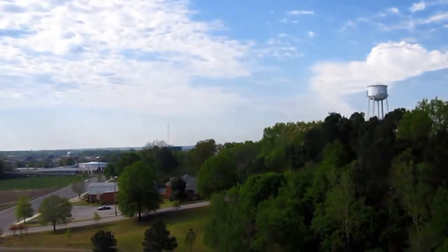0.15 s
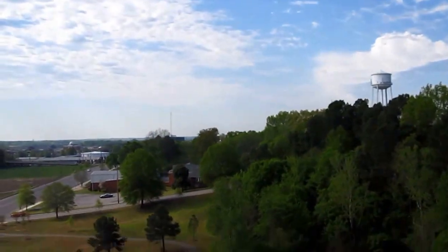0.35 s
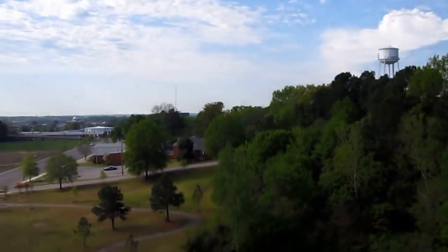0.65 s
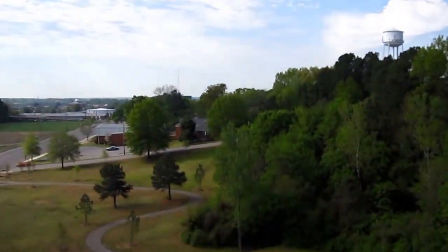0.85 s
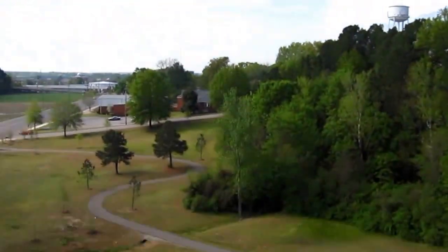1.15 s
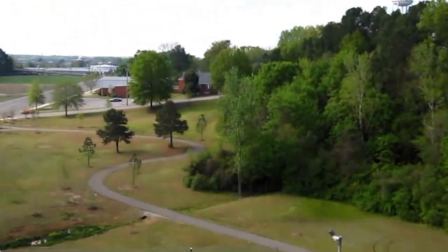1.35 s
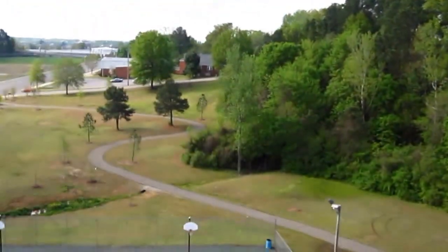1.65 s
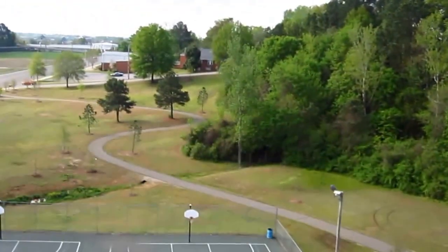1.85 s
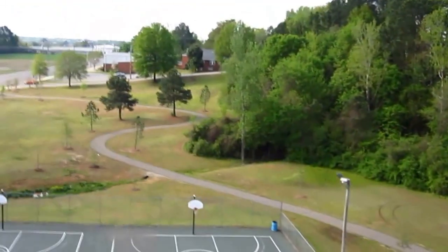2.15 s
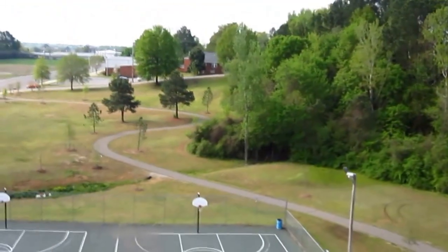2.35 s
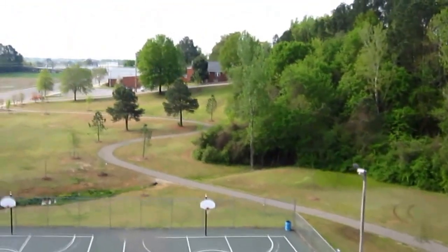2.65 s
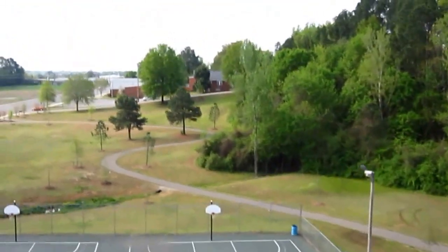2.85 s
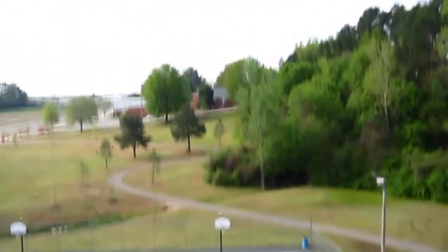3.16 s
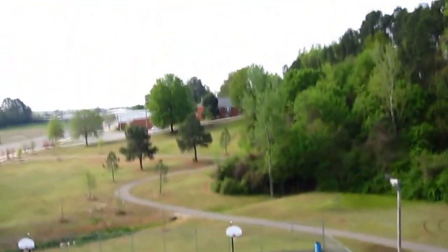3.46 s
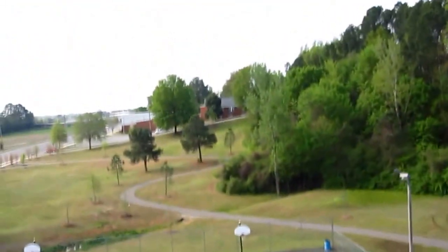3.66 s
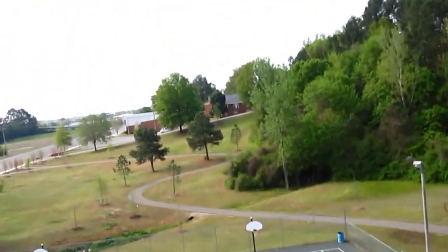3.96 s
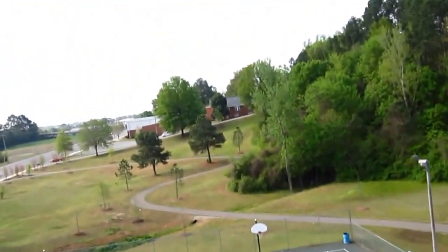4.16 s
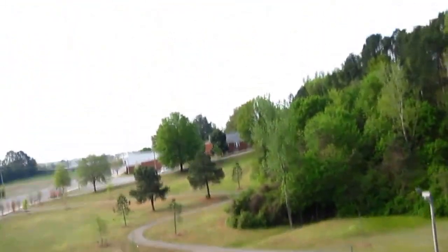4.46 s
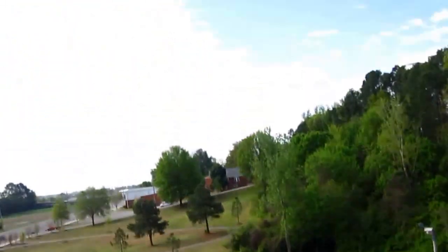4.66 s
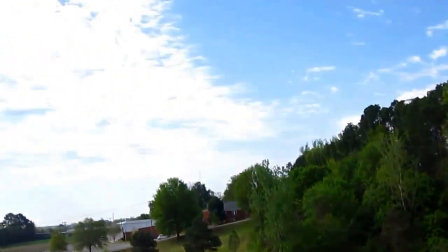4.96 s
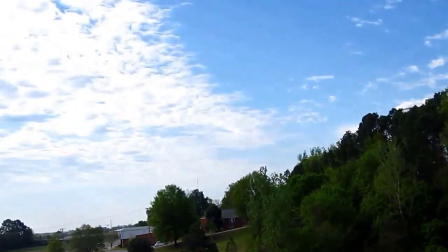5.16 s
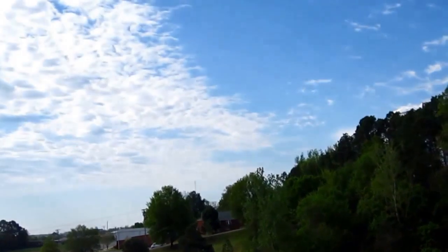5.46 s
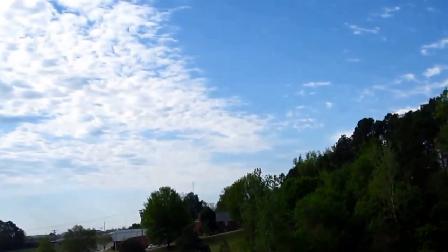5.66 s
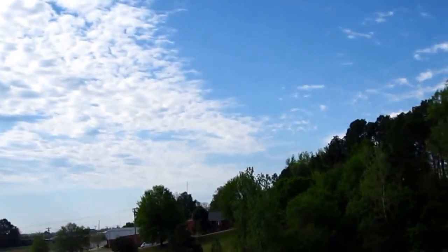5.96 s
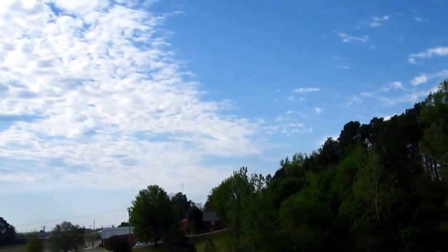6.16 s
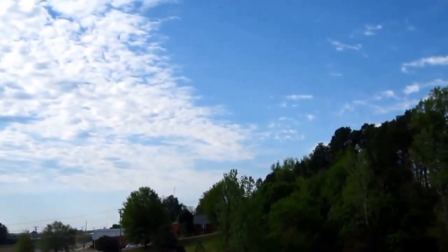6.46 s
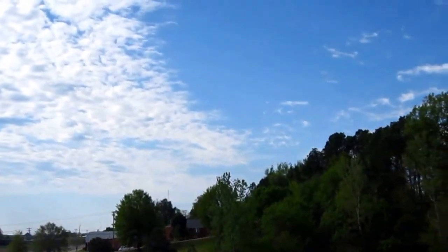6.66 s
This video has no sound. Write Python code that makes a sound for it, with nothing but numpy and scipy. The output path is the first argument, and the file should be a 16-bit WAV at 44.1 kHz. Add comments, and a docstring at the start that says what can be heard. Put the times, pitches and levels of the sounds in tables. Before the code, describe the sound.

A small electric model helicopter whines steadily up close, its pitch rising a little over rushing rotor wind.

```python
"""The gear whine of a small electric helicopter in flight, close up, from one camera microphone on board.
A 13-tooth pinion meshes with the 150-tooth main gear and the sound comes straight through the frame,
along with the speed controller chopping the current. The pitches follow one motor shaft; only the chop
rate stays put. Behind the whine the two-blade rotor slaps and, with the tail rotor, blows turbulent air
over the microphone."""
import sys
import numpy as np
from scipy import signal
from scipy.io import wavfile
from scipy.ndimage import uniform_filter1d

SR = 44100
rng = np.random.default_rng(int(sys.argv[2]) if len(sys.argv) > 2 else 0)


def materialize(psi):
    """Save the field psi as 16-bit PCM at rate SR to the path in sys.argv[1].

    A 1-D psi becomes a single channel; in a 2-D psi each row is a channel.
    """
    bounded = np.clip(np.atleast_2d(psi).T, -1, 1)
    quanta = np.round(bounded * 32767).astype(np.int16)
    wavfile.write(sys.argv[1], SR, quanta)


N = 300321
TIME = np.arange(N) / SR
PINION, MAIN_GEAR = 13, 150  # teeth
LAY_RATIO, TAIL_RATIO = 25 / 32, .3673  # lay shaft and tail rotor turns per motor turn
BLADE_RATIO = 2 * PINION / MAIN_GEAR  # blade passes per motor turn


def gain_of(db):
    """Decibels to a factor."""
    return 10 ** (np.asarray(db) / 20)


def unit_rms(x):
    """Scales to rms 1."""
    return x / np.sqrt(np.mean(x ** 2) + 1e-20)


def curves(table):
    """Each column after t/s as a curve, one value a sample."""
    times, *values = np.transpose(table)
    return [np.interp(TIME, times, v) for v in values]


def wander(lo_hz, hi_hz):
    """Slow random motion between two rates, rms 1."""
    band = signal.butter(2, [lo_hz, hi_hz], "band", fs=SR / 50, output="sos")
    coarse = signal.sosfiltfilt(band, rng.standard_normal(N // 50 + 802))[400:-400]
    return np.interp(np.arange(N) / 50, np.arange(len(coarse)), unit_rms(coarse))


def tone(cycles, db, waver, start=None):
    """A sine of given rms level whose strength wavers a little; start in cycles, else random."""
    start = rng.random() if start is None else start
    strength = np.sqrt(2) * gain_of(db) * (1 + waver * wander(1.46, 55))
    return strength * np.cos(2 * np.pi * (cycles + start))


def turbulence(spectrum, patchy_db, gusty_db, band_hz):
    """Noise with drifting patches and gusts common to all pitches, rms 1 inside band_hz."""
    steps, hz = N // 128 + 5, np.fft.rfftfreq(512, 1 / SR)
    real, imag, patches = rng.standard_normal((3, steps, 257)).transpose(0, 2, 1)
    patches = unit_rms(uniform_filter1d(uniform_filter1d(patches, size=6, axis=0), size=14, axis=1))
    gusts = unit_rms(uniform_filter1d(rng.standard_normal(steps), size=5))
    f, db = np.transpose(spectrum)
    colour_db = np.interp(np.log(hz + 1), np.log(f), db, left=-60, right=-60)
    bins = (real + 1j * imag) * gain_of(colour_db[:, None] + patchy_db * patches + gusty_db * gusts)
    in_band = (hz > band_hz[0]) & (hz < band_hz[1])
    share = np.sum(abs(bins[in_band]) ** 2) / np.sum(abs(bins) ** 2)
    return unit_rms(signal.istft(bins, nperseg=512, noverlap=384)[1][:N]) / np.sqrt(share)


# Motor shaft speed: t/s, f/Hz
SHAFT_SPEED = [(0.0, 367.79), (0.56, 368.18), (1.16, 366.18), (1.3, 366.54), (1.39, 366.68), (1.49, 369.28),
               (1.72, 383.6), (2.18, 404.77), (2.28, 407.74), (2.51, 418.22), (2.97, 431.58),
               (3.11, 438.36), (3.25, 442.73), (3.34, 443.95), (3.53, 441.63), (3.76, 442.92),
               (4.23, 431.84), (4.78, 435.45), (5.15, 433.7), (5.48, 427.72), (5.94, 422.88), (6.8, 417.05)]
# Swing of the shaft angle: t/s, rms angle/deg
SHAFT_HUNTING = [(0, .62), (1.3, .8), (1.5, 2.4), (2, .85), (2.6, .8), (3, 2.6), (3.5, .54), (4, 1.2),
                 (4.25, 2.8), (4.4, 5), (4.6, 2.6), (4.9, 1.8), (5.27, 3.3), (5.6, 1.2), (6.81, .5)]

def shaft_turns():
    """Motor angle in turns; the shaft hunts to and fro when the load is unsteady."""
    hunting = curves(SHAFT_HUNTING)[0] / 360 * wander(6, 35)
    return np.cumsum(curves(SHAFT_SPEED)[0]) / SR + hunting


def shaft_speed(turns):
    """Smoothed shaft speed in Hz."""
    return uniform_filter1d(np.gradient(turns), size=4000, mode="nearest") * SR


def faint_level(slow_db, fast_db, speed):
    """A faint tone's dB: slow_db up to a shaft speed of 370 Hz, sliding to fast_db by 415 Hz."""
    return slow_db + np.clip((speed - 370) / 45, 0, 1) * (fast_db - slow_db)


# Peaks and notches of the path through the frame to the microphone, low and high range: f/Hz, gain/dB
FRAME_PATH_LOW = [(280, -3), (300, 0), (318, 13), (331, -1), (338, -6), (346, 5), (366, 4.5), (390, -9),
                  (435, 0), (590, 0), (635, 5), (670, -2), (695, 3), (735, -3), (775, 8), (830, -4),
                  (975, 4), (1035, -6), (1590, -7), (1750, -4), (1820, 11), (1870, 3.5), (1930, 0)]
FRAME_PATH_HIGH = [(4400, 2), (5050, -1.5), (5250, -1), (5460, -2.5), (5550, -7), (5640, 0), (5800, -3),
                   (6100, 7.5), (6500, 0), (8800, -2), (9600, -1.5), (10000, -0.5), (10250, -1), (10450, 5),
                   (10650, 4), (10900, 1.7), (11100, -0.5), (11250, -6), (11400, 2.5), (11850, 2.5),
                   (12050, -10), (12230, 2), (12420, 5), (12600, 0), (13200, -3)]

def through_frame(levels, hz, speed, slow_hz=368, fast_hz=438):
    """A tone's dB at the microphone: a straight law of shaft speed plus the frame's gain at its pitch."""
    f, db = np.transpose(FRAME_PATH_LOW + FRAME_PATH_HIGH)
    slow_db, fast_db = levels
    source_db = slow_db + (fast_db - slow_db) * (speed - slow_hz) / (fast_hz - slow_hz)
    return source_db + np.interp(hz, f, db)


def mount_rocking(speed, resonance_hz=435, width_hz=7.9, lift_db=13):
    """Near one speed the motor rocks on its mount: the lift in dB of tones tied to its turn."""
    return lift_db * np.exp(-((speed - resonance_hz) / width_hz) ** 2)


# Load on the main rotor: t/s, level/dB
ROTOR_LOAD = [(0, 1), (1.55, 1), (1.76, 4.5), (2, 3.5), (2.3, 1), (2.6, 3), (2.8, 6.5), (3, 7.5),
              (3.3, 6.5), (3.8, 5.5), (4.4, 7), (4.7, 6.5), (5.2, 6.5), (5.65, 7.5), (5.9, 6), (6.2, 4.5),
              (6.81, 3)]

def rotor_load():
    """How hard the rotor works, in dB over a calm hover."""
    return curves(ROTOR_LOAD)[0]


# Gusts right on the microphone: t/s, level/dB
MIC_GUSTS = [(2.58, -51), (2.65, -50), (2.74, -51), (2.925, -43), (3.08, -45), (3.19, -46), (3.33, -40),
             (4.85, -48), (5.07, -48)]

def gust_thumps(half_width_s=0.018, band_hz=(70, 700)):
    """Each gust thumps the microphone with a brief burst of low noise."""
    band = signal.butter(1, band_hz, "band", fs=SR, output="sos")
    rumble = unit_rms(signal.sosfilt(band, rng.standard_normal(N)))
    return rumble * sum(gain_of(db) * np.exp(-((TIME - t) / half_width_s) ** 2) for t, db in MIC_GUSTS)


# Shaking under the microphone, a row for each of the orders below: slow level/dB, fast level/dB
UNBALANCE_HUMS = [(-68, -63), (-59, -61.5), (-64, -59.5), (-62, -65), (-67, -57), (-64.5, -55)]

def unbalance(turns, speed):
    """Unbalance in the lay shaft and the motor shakes low hums into the frame."""
    orders = LAY_RATIO, 1, 2 * LAY_RATIO, 2, 3 * LAY_RATIO, 2 + 3 * LAY_RATIO  # cycles per motor turn
    return sum(tone(k * turns, through_frame(row, k * speed, speed), waver=0.22)
               for k, row in zip(orders, UNBALANCE_HUMS))


# Tail rotor drive, at the far end of the frame: harmonic, slow level/dB, fast level/dB
TAIL_HARMONICS = [(2, -70, -59), (11, -66, -56), (15, -62, -48), (18, -56, -52), (21, -54, -51),
                  (22, -48, -45), (23, -48, -50), (25, -49, -49), (26, -45, -48), (27, -53, -53),
                  (50, -60, -48)]

def tail_rotor(turns, speed):
    """Weak wavering harmonics of the tail rotor's turn."""
    return sum(tone(k * TAIL_RATIO * turns, faint_level(slow_db, fast_db, speed), waver=0.24)
               for k, slow_db, fast_db in TAIL_HARMONICS)


# Main blades, at close range: t/s, level/dB of hum harmonics 1, 2 and 3, slap level/dB
BLADE_LEVELS = [(0, -69, -65, -72, -63), (0.6, -68, -72, -71, -63), (1.9, -63, -77, -71, -63),
                (2.1, -70, -74, -69, -62), (2.8, -76, -72, -68, -58), (3.25, -66, -68, -66, -55),
                (3.45, -59, -59, -64, -58), (4.4, -54.5, -60, -68, -62), (4.75, -59, -62, -68, -59),
                (4.87, -66, -70, -67, -55), (5.05, -60, -68, -64, -52), (5.55, -58, -58, -54.5, -46),
                (5.85, -63, -64, -57, -50.5), (6.1, -60, -59, -58, -48.5), (6.5, -60, -58.5, -58, -51.5),
                (6.81, -62, -66, -59, -54)]

def blade_hum(turns):
    """Three harmonics of the blade pass rate, lined up on the slap."""
    return sum(tone(k * BLADE_RATIO * turns, db, waver=0.22, start=.5 - .12 * k)
               for k, db in zip((1, 2, 3), curves(BLADE_LEVELS)))


def blade_slap(turns, puff_gain=0.7, surge_hz=13.3, surge_depth=0.4, crest_s=6.01):
    """Each passing blade gives a suction pulse and a puff of noise, uneven in size, surging in groups."""
    passes = BLADE_RATIO * turns + .38
    size = gain_of(1.3 * rng.standard_normal(700))[np.clip(passes, 0, None).astype(int)]
    from_centre = passes % 1 - .5
    pulse = -np.exp(-(from_centre / 0.034) ** 2) * size
    pulse = signal.sosfiltfilt(signal.butter(4, 255, "high", fs=SR, output="sos"), pulse)
    puff = np.exp(-(from_centre / .1) ** 2) * size * rng.standard_normal(N)
    puff = signal.sosfiltfilt(signal.butter(2, [200, 900], "band", fs=SR, output="sos"), puff)
    surge = 1 + surge_depth * np.cos(2 * np.pi * surge_hz * (TIME - crest_s))
    return gain_of(curves(BLADE_LEVELS)[-1]) * surge * (puff_gain * unit_rms(puff) + unit_rms(pulse))


# Spectra of the air streaming over the microphone: f/Hz, relative level/dB
ROAR_SPECTRUM = [(700, -23.5), (1500, -28.5), (1800, -3), (2600, -0.5), (3400, 1.5), (4000, 1),
                 (4650, -6.5), (5100, -14), (6000, -13)]
BUFFET_SPECTRUM = [(25, -24), (100, -7.5), (200, -8.5), (400, -4), (900, 2), (1500, 4.5), (2200, 2),
                   (4000, -57)]
HISS_SPECTRUM = [(4300, -29), (5200, 1), (5900, -4), (6600, -1), (7200, -1), (7800, 1), (8600, -4),
                 (9500, 1), (10800, 3), (11800, 1), (12500, -10), (13500, -15.5), (15000, -16.5),
                 (16000, -21)]
# Rows for roar, buffeting and hiss: in-band level/dB in a calm hover, rise/dB per dB of load
DOWNWASH_LEVELS = [(-39.5, 1.27), (-53.5, 1.6971), (-44.5, 1.1354)]

def downwash(turns):
    """Rotor wind: a mid roar, low buffeting and a hiss, each fluttering with the part that stirs it."""
    roar_gain, buffet_gain, hiss_gain = (gain_of(db + rise * rotor_load()) for db, rise in DOWNWASH_LEVELS)
    blade, tail, lay = (2 * np.pi * k * turns for k in (BLADE_RATIO, TAIL_RATIO, LAY_RATIO))
    swell = gain_of(0.5 * wander(1.3, 38))
    roar = roar_gain * turbulence(ROAR_SPECTRUM, patchy_db=0.92, gusty_db=0.15, band_hz=(1900, 4200))
    roar *= 1 + 0.061 * np.cos(blade) + 0.049 * np.cos(tail) + 0.015 * np.cos(2 * tail)
    buffet = buffet_gain * turbulence(BUFFET_SPECTRUM, patchy_db=1.2, gusty_db=0, band_hz=(450, 1400))
    buffet *= 1 + 0.19 * np.cos(blade - .9)
    hiss = hiss_gain * turbulence(HISS_SPECTRUM, patchy_db=1.04, gusty_db=-1.6, band_hz=(6500, 7500))
    hiss *= 1 + 0.041 * np.cos(lay)
    return swell * (roar + buffet + hiss)


# Motor tones ahead of the frame, four chop rows then two commutation rows: slow level/dB, fast level/dB
MOTOR_TONES = [(-42.5, -41.5), (-42.5, -37), (-41, -40), (-31, -49), (-40, -47.5), (-54, -41)]
# Faint partials: on the chop tone (0 or 1), motor order, lay shaft order, slow level/dB, fast level/dB
MOTOR_PARTIALS = [(0, 5, 0, -59, -52), (0, 6, 0, -52, -52), (0, 13, -2, -62, -54), (0, 14, 0, -49, -45),
                  (0, 13, 2, -57, -51), (0, 14, 1, -62, -50), (0, 13, 3, -65, -47), (0, 18, 0, -61, -47),
                  (0, 26, -4, -56, -46), (0, 23, 0, -50, -45), (0, 25, -1, -52, -43), (0, 27, 1, -52, -50),
                  (0, 28, 0, -55, -50), (0, 26, 3, -47, -53), (0, 26, 4, -46, -56), (1, 13, 0, -58, -62),
                  (0, 31, 0, -61, -54), (0, 39, 0, -62, -52), (1, 8, 0, -48, -39), (1, 10, 0, -42, -50)]

def motor_whine(turns, speed, chop_hz=7813.3):
    """The speed controller's chop beats with the magnet poles, over commutation tones and partials."""
    pole_orders = 0, 6, 9, 12
    chop_db = [through_frame(row, chop_hz + k * speed, speed) for k, row in zip(pole_orders, MOTOR_TONES)]
    chop_db[0] += 0.89 * rotor_load()  # the chop itself grows with the load
    whine = sum(tone(chop_hz * TIME + k * turns, db, waver=0.047) for k, db in zip(pole_orders, chop_db))
    commutation_db = through_frame(MOTOR_TONES[-2], 24 * speed, speed) + mount_rocking(speed)
    whine += tone(24 * turns, commutation_db, waver=.12)
    whine += tone(30 * turns, through_frame(MOTOR_TONES[-1], 30 * speed, speed), waver=.12)
    for on_chop, motor_order, lay_order, slow_db, fast_db in MOTOR_PARTIALS:
        cycles = on_chop * chop_hz * TIME + (motor_order + lay_order * LAY_RATIO) * turns
        whine += tone(cycles, faint_level(slow_db, fast_db, speed), waver=0.17)
    return whine


# Throb of the mesh: multiple of the main rotor's turn, depth (0-1), twist/rad
MESH_THROB = [(1, .12, -.04), (2, .12, .12)]
# Mesh tones ahead of the frame, a row for each of the first ten orders: slow level/dB, fast level/dB
MESH_TONES = [(-55, -49.5), (-52.5, -36.5), (-30, -29.5), (-56.5, -41.5), (-30.5, -53), (-26, -29),
              (-22, -27.5), (-29, -31.5), (-37, -51), (-30.5, -88)]

def gear_whine(turns, speed):
    """Tooth mesh, overtone and side tones; the rotor's uneven load throbs and twists them as it turns."""
    rotor = 2 * np.pi * turns * PINION / MAIN_GEAR
    throb = 1 + sum(depth * np.cos(k * rotor + k) for k, depth, _ in MESH_THROB)
    throb += 0.17 * wander(60, 430)  # rough tooth faces spread a haze around every tone
    twist = sum(rad * np.sin(k * rotor) for k, _, rad in MESH_THROB) / (2 * np.pi * PINION)
    mesh, overtone, lay = PINION, 2 * PINION, LAY_RATIO  # cycles per motor turn
    orders = [mesh - 1, mesh - lay, mesh, mesh + lay,
              overtone - 1, overtone - lay, overtone, overtone + lay, overtone + 1, overtone - BLADE_RATIO]
    rocked = mesh - 1, overtone - 1, overtone + 1
    levels = [through_frame(row, k * speed, speed) + (k in rocked) * mount_rocking(speed)
              for k, row in zip(orders, MESH_TONES)]
    # second side tones grow as the square of the one at overtone - lay
    orders += [overtone - 2 * lay, overtone + 2 * lay]
    levels += [2 * levels[5] + offset_db for offset_db in (7, 6)]
    # eccentric wheels swing pitch more than level: first side tones stand about a quarter cycle off
    starts = .22, .22, 0, .22, .22, .22, 0, .22, .22, 0, 0, 0
    return throb * sum(tone(k * (turns + twist), db, waver=0.096, start=start)
                       for k, db, start in zip(orders, levels, starts))


def scene():
    """Everything meets at the one microphone on the frame, copied to both channels."""
    turns = shaft_turns()
    speed = shaft_speed(turns)
    mono = gear_whine(turns, speed) + motor_whine(turns, speed) + tail_rotor(turns, speed)
    mono += blade_hum(turns) + unbalance(turns, speed) + blade_slap(turns)
    mono += downwash(turns) + gust_thumps()
    return np.array([mono, mono])


def record(dry):
    """The camera's sound stops sharply at 15640 Hz."""
    lowpass = signal.firwin(1023, 15640, window=("kaiser", 9), fs=SR)
    return signal.oaconvolve(dry, lowpass[None], "same")


dry = scene()
out = record(dry)
materialize(out)
```